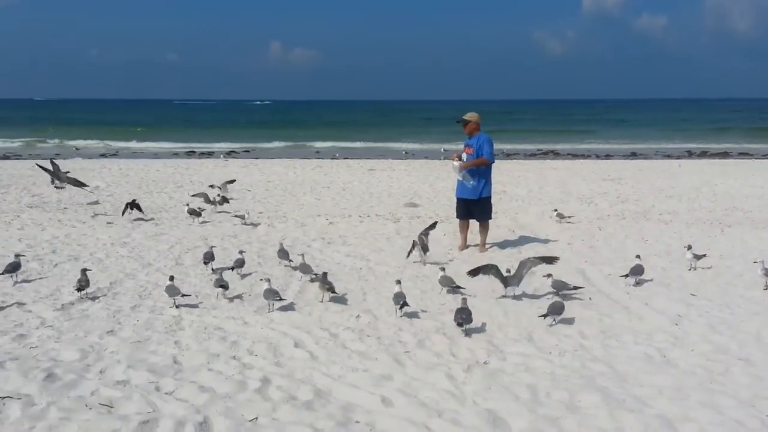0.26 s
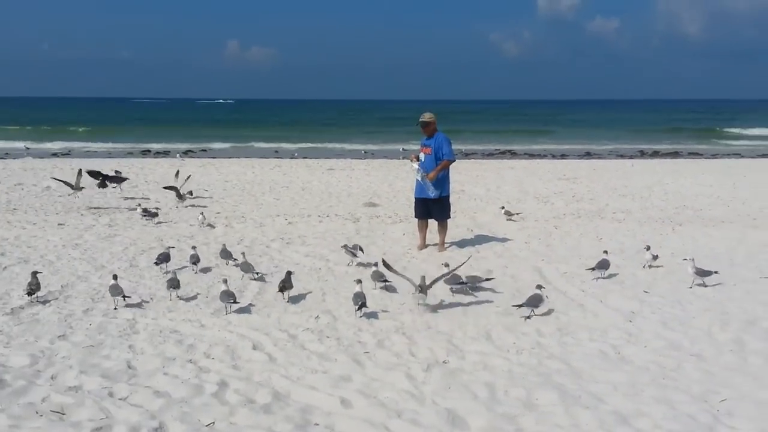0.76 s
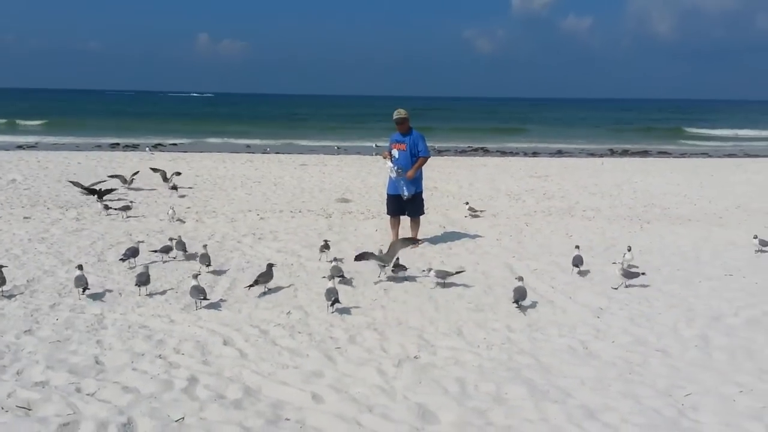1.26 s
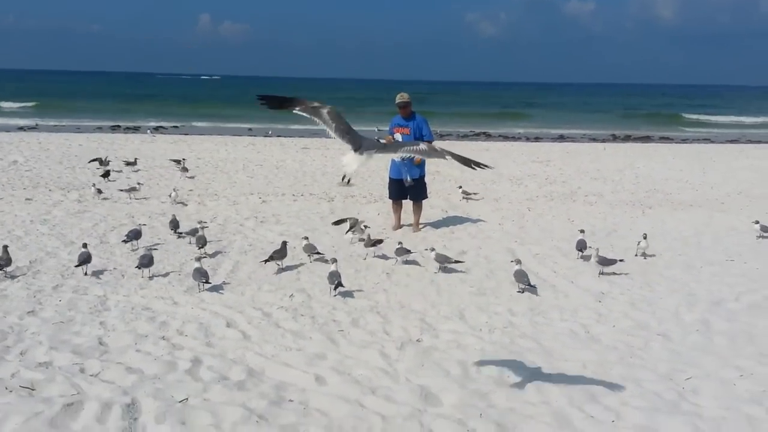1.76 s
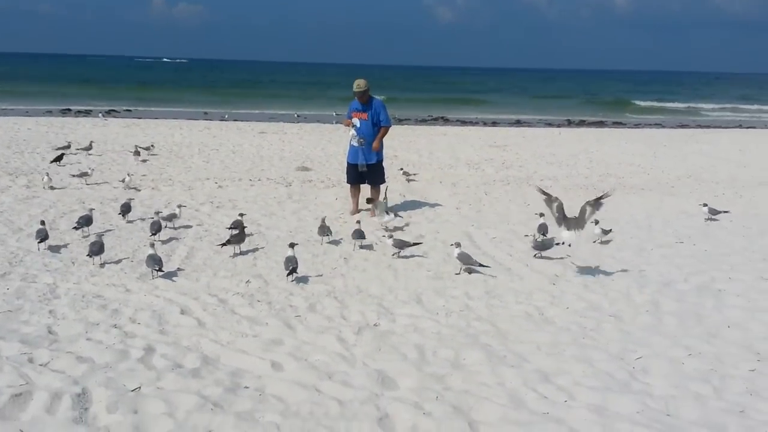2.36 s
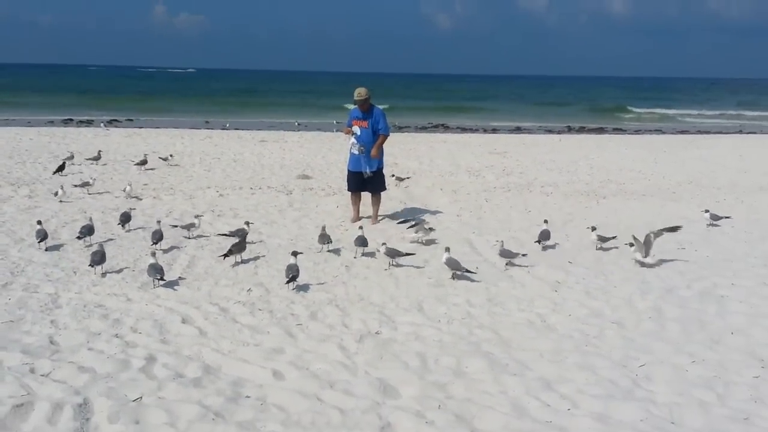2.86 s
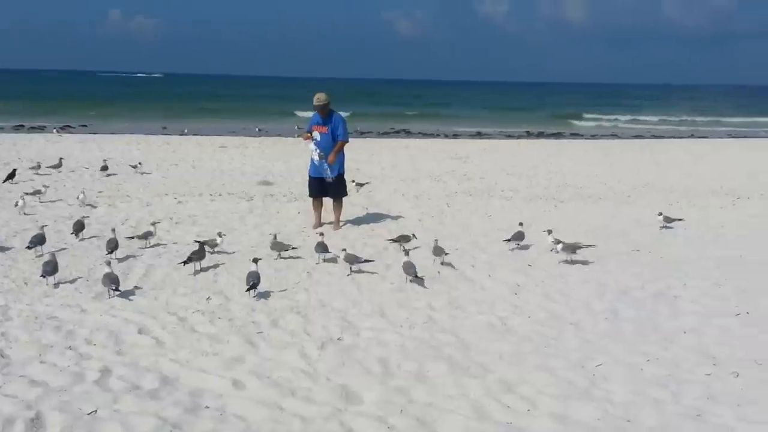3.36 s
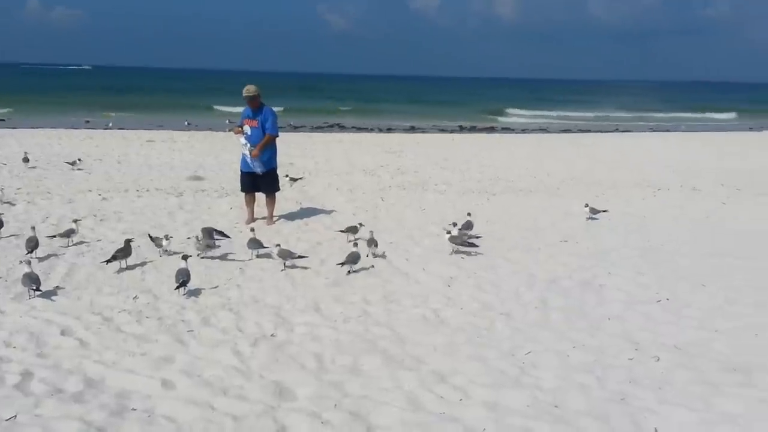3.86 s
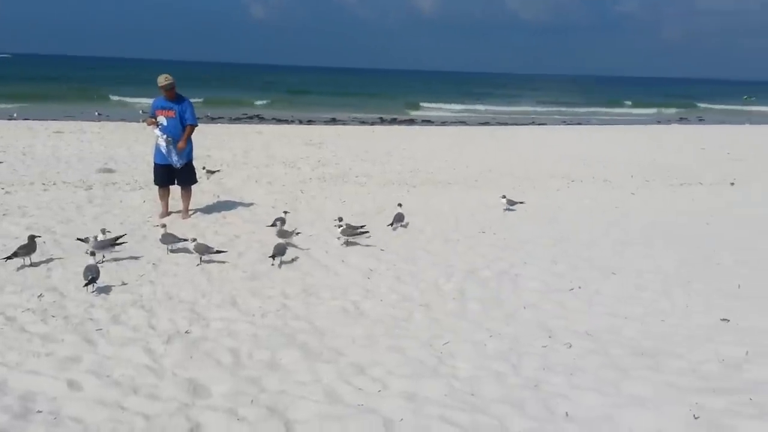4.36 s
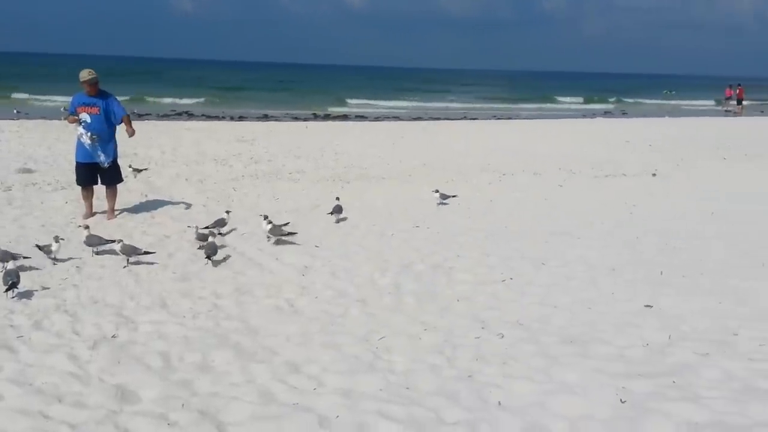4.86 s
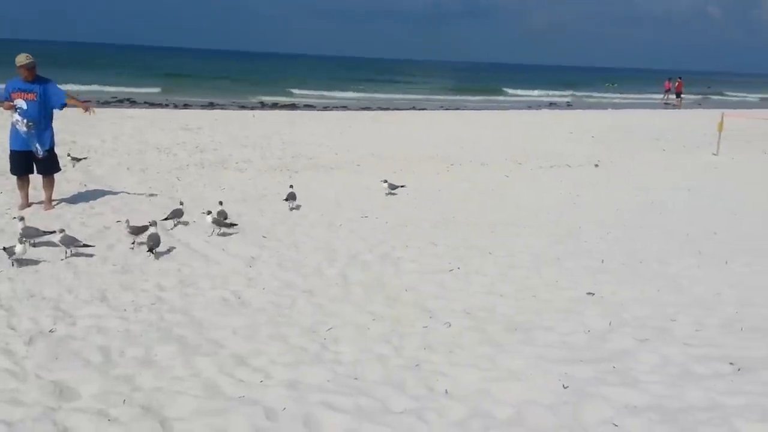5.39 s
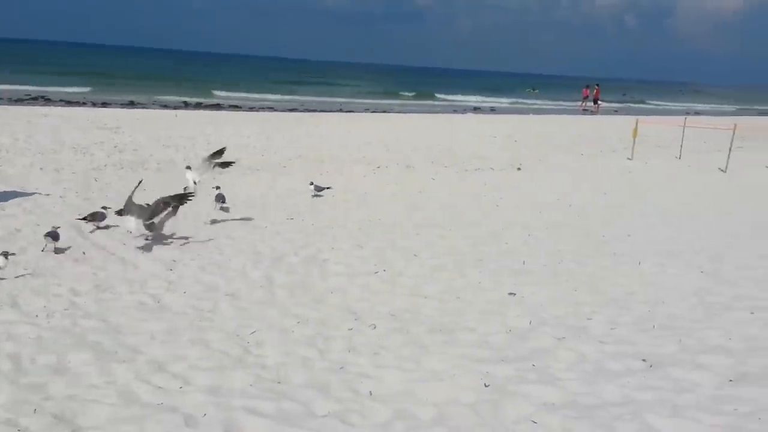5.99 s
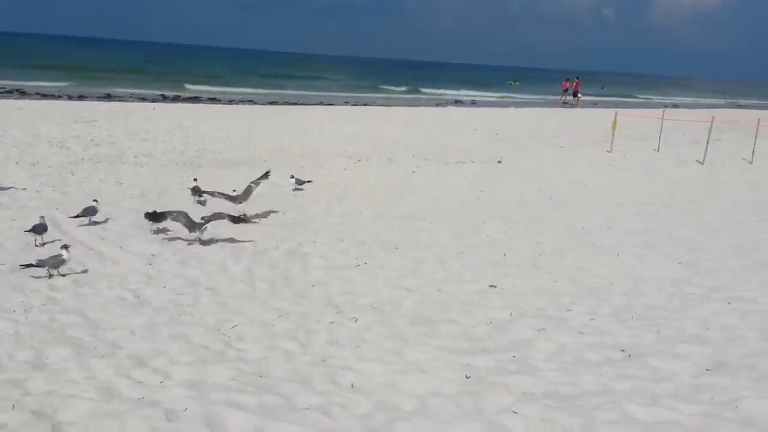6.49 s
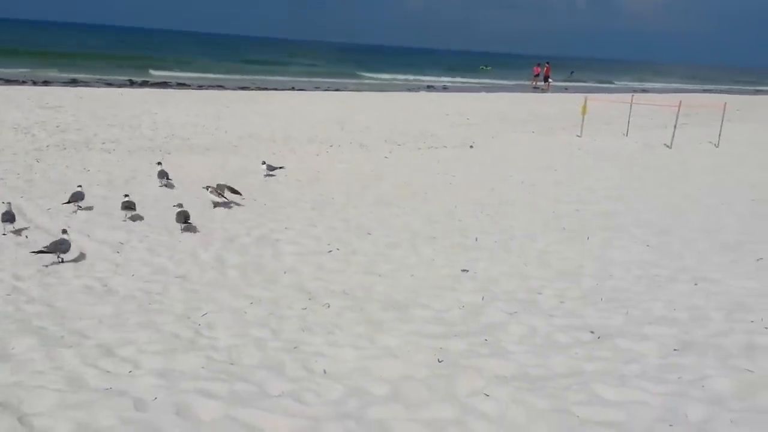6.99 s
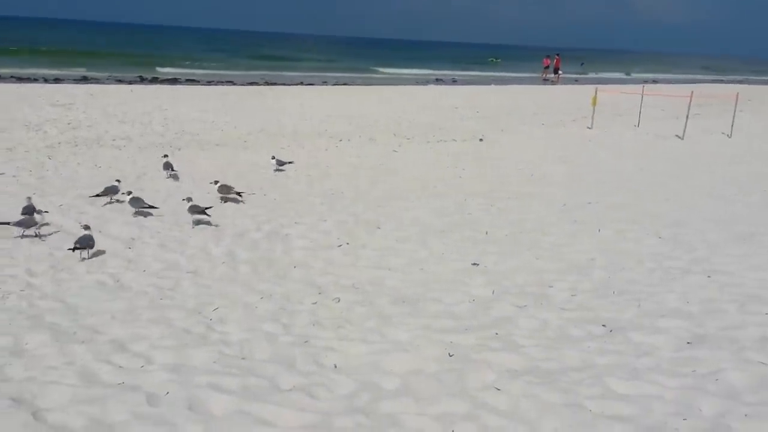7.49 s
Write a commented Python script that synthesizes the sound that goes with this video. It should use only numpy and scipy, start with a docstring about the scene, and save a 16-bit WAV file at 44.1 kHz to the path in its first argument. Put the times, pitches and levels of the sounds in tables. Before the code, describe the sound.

An open beach with gulls begging, low surf behind and a faint far engine hum with an unsteady drone. At 0 s a short raspy squawk leads into a thin warbling whistle around 3 kHz, lasting a third of a second, then a soft cluck. Squawks with clear peeps come at 0.75 and 1.05 s, followed by a bending double whistle at 1.2 s. Another squawk, cluck and short warble run from 1.6 to 1.95 s. Surf mostly fills the gap, with very faint clucks near 2.5 s. A small squawk at 3.45 s, a hoarse fading mew with peeps from 3.75 to 4.05 s, and a short squawk at 4.45 s follow. The loudest burst, harsh squawk and high sobbing whistle, runs 5.0 to 5.5 s as a wave swells. A similar call comes at 5.97 to 6.35 s. The engine eases at 6.5 s; a last squawk and peep sound at 6.85 s, then surf alone.

```python
"""Gulls beg for food on an open beach: thin warbling whistles, peeps, raspy squawks, clucks, one hoarse mew.
Whistles and peeps are nearly pure syrinx tones; the rougher cries are syrinx pulses that ring the throat,
and forcing them makes the cycles uneven and hissy. Sand scatters a brief, weak copy of every call.
Low surf, noise in bands that swell with the breakers, rushes behind them. A far engine hums with its
octave beside an unsteady drone. A stereo recorder listens: its body shades one side and its top is cut."""
import sys
import numpy as np
from scipy import signal
from scipy.fft import rfft, irfft, next_fast_len
from scipy.io import wavfile
from scipy.ndimage import uniform_filter1d

SR = 44100
rng = np.random.default_rng(int(sys.argv[2]) if len(sys.argv) > 2 else 0)


def dump(signal):
    """Clip the signal to [-1, 1] and save it as 16-bit WAV at the path in sys.argv[1]."""
    limited = np.clip(np.atleast_2d(signal).T, -1, 1)
    pcm = np.round(limited * 32767).astype(np.int16)
    wavfile.write(sys.argv[1], SR, pcm)


N = 341334
TIME = np.arange(N) / SR

# Sobs that chain into begging whistles; most lift to a crest and fall into the next:
# start_s, dip_pitch_hz, lift_hz, crest_place (0-1 of the sob), dip_level_db
SOBS = [ (0, 3030, 10, .5, -18), (.04, 3070, 0, .5, -25), (.095, 3330, 30, 0.46, -27.5),
        (.185, 3473, 1100, .5, -26.5), (.202, 3260, -70, .4, -26), (.22, 3270, 330, .55, -25),
        (.26, 3050, 220, 0.54, -22.5), (1.677, 3050, 150, 0.5, -39), (1.745, 3060, 240, .64, -26.5),
        (1.819, 3070, 300, 0.4, -26), (5.055, 2960, 45, .5, -16.5), (5.074, 3100, -10, .5, -15),
        (5.102, 3030, -75, 0.56, -19.5), (5.167, 4347, 0, .5, -23), (5.215, 4270, 168, 0.78, -23),
        (5.263, 3990, 310, 0.45, -19.5), (5.305, 3900, 409, 0.5, -18.5), (5.349, 3830, 490, .65, -16.5),
        (5.396, 3670, 440, 0.6, -19.5), (5.435, 3030, -30, 0.6, -20.5), (5.449, 2915, 10, .5, -15.5),
        (6.003, 3050, 45, .35, -16), (6.04, 3130, 200, 0.83, -25.5), (6.12, 3310, 250, 0.8, -23.5),
        (6.171, 3250, 352, .78, -24.5), (6.217, 3160, 460, 0.75, -21), (6.271, 3085, 0, .5, -21),
        (6.284, 3080, 269, .38, -21.5)]
# Whistles; each takes the waiting sobs up to its end: end_s, last_pitch_hz, last_level_db,
# thinning (dB per Hz of lift), octave_db (before bill and thinning), third_partial_db (re octave),
# half_line_db, left_minus_right_db (where fully shaded), left_lag_ms
WHISTLES = [ (.332, 2860, -38, .012, -10.5, -26, -25, -4.5, -.03),
            (1.886, 2845, -33, .01, -17.5, -8.5, -32, 1, -.039),
            (5.168, 3490, -30, 0.03, 0, -19, -26, -12, .033),
            (5.435, 3860, -22.5, .019, -13, -25, -36, -3, -.035),
            (5.488, 2760, -38, -0.02, -3, -22, -34, -8, .031),
            (6.355, 2790, -32, .022, -11, -24, -29, -10.5, .11)]
# Bill colouring of the whistles' octave: frequency_hz, gain_db
BILL = [(5600, -9), (6150, 0.5), (6500, -5), (6900, -9), (7800, -27), (8500, -9)]
# Two voices of a double whistle: time_s, pitch_hz, level_db, octave_db (re fundamental)
WHISTLE_ARCH = [(1.138, 3000, -39, -9), (1.17, 3220, -32, 1), (1.21, 3450, -37.5, 2.5),
                (1.245, 3580, -40, -2), (1.275, 3490, -39, 2.5), (1.3, 3160, -30, -1),
                (1.318, 2800, -43, -10)]
WHISTLE_FLAT = [(1.176, 3060, -32, -20), (1.186, 2970, -25, -14), (1.205, 2924, -22.5, -16),
                (1.225, 3080, -28.5, -8), (1.25, 3130, -33, -3), (1.275, 3020, -36, -12)]
# Both sides of the syrinx in that one call: curve, third_partial_db (re octave),
# left_minus_right_db (where fully shaded), left_lag_ms
TWO_VOICES = [(WHISTLE_ARCH, -13, -1, .027), (WHISTLE_FLAT, -22, -10, .06)]
# Short near-pure notes: peeps, clear notes within squawks, and the mew's last overtone:
# start_s, end_s, top_pitch_hz, end_sag (share of pitch), glide (share of pitch),
# level_db (at the swell's peak), left_minus_right_db (where fully shaded)
CLEAR_NOTES = [ (.76, 0.784, 2195, 0.0052, 0, -29.5, -16), (0.777, 0.813, 3035, 0.046, 0.0072, -28, -11),
               (1.054, 1.086, 2250, 0.013, .012, -26.5, -14), (1.072, 1.11, 3030, 0.0032, -0.04, -26.5, -9),
               (1.633, 1.65, 2180, 0.019, -.01, -34, -2), (1.639, 1.675, 3080, .025, .012, -27, 1),
               (1.879, 1.9, 2440, 0, -0.256, -33.5, -4), (3.459, 3.517, 3010, 0.079, 0.0014, -33, -16),
               (3.895, 3.947, 3000, 0.032, 0, -31, -22), (3.923, 3.967, 3080, 0.08, 0.022, -25.5, -14),
               (4.02, 4.084, 2300, 0.017, 0, -38.5, 1.5), (4.457, 4.507, 2965, 0.102, -0.093, -32, -12.5),
               (6.85, 6.866, 2170, .01, 0, -34, -4), (6.861, 6.91, 3070, 0.034, -0.025, -34, -15)]
# Squawks: start_s, end_s, top_pitch_hz, end_sag (share of pitch), glide (share of pitch),
# level_db (at the swell's peak), start_roughness (0 clean, about 1 harsh), end_roughness (same scale),
# left_minus_right_db (where fully shaded)
SQUAWKS = [ (0, .022, 736, .02, 0, -31, 0.6, .3, -5), (.35, .42, 865, .14, -0.0068, -34, .18, .18, -2.5),
           (.722, .78, 640, 0.044, .2, -32.5, 0.56, 0.6, -2.5),
           (.758, .795, 726, .02, 0.0071, -26.5, 0.32, 0, -16),
           (1.026, 1.076, 655, .05, 0.21, -32, 0.4, 0.7, -9),
           (1.585, 1.652, 684, 0.043, 0.18, -29.5, .7, 1.22, -2),
           (1.618, 1.657, 750, 0.0082, -0.033, -26.5, 0.7, 0.1, -19),
           (1.895, 1.965, 713, .16, -.02, -37.5, .35, .4, -1),
           (3.44, 3.525, 987, .14, 0.016, -38.5, 0.37, 0.14, -20.5),
           (4.435, 4.51, 977, 0.143, 0.018, -34, .6, 0.42, -10),
           (5.018, 5.06, 700, .03, .05, -28.5, 0.76, 1, -6),
           (5.035, 5.063, 732, 0.033, 0.029, -16, 1.03, 0.64, -7),
           (5.966, 6.015, 732, 0.046, 0.002, -21.5, 0.96, 0.83, -11),
           (6.82, 6.874, 685, 0.039, 0.17, -33, 0.4, 0.3, -13),
           (6.857, 6.905, 1022, 0.024, -0.02, -30.5, 0.19, 0, -17)]
# Low clucks, and the low, darker part under some squawks: start_s, end_s, top_pitch_hz,
# end_sag (share of pitch), glide (share of pitch), level_db (at the swell's peak),
# start_roughness (0 clean, about 1 harsh), end_roughness (same scale),
# left_minus_right_db (where fully shaded)
LOW_CALLS = [ (.345, .425, 860, .2, -0.009, -37.5, 0.22, .2, -1),
             (1.03, 1.07, 600, .03, .2, -41, .4, .5, -3), (1.585, 1.645, 620, .03, .18, -40, .5, .7, -1),
             (1.685, 1.742, 665, 0.27, 0.036, -31, .3, 0.22, 1),
             (1.89, 1.97, 713, .2, -0.0058, -32.5, .4, 0.43, 4),
             (2.4, 2.5, 632, 0.15, -0.0065, -40, 0.26, 0.24, 0),
             (2.46, 2.69, 1015, 0.0092, -0.025, -43, 0.29, 0.28, 0),
             (5.035, 5.075, 736, .03, 0.032, -36.5, 1, .8, -3),
             (6.03, 6.12, 621, 0.018, -0.044, -40.5, 0.18, .2, -2),
             (6.215, 6.28, 774, 0.1, 0.0052, -41.5, .2, .2, -2)]
# The hoarse mew's push of air: time_s, pitch_hz, effort_db (evened and raised in mew())
MEW_CURVE = [(3.758, 1011, -46), (3.782, 1116, -33), (3.802, 1166, -30.5), (3.85, 1219, -26.5),
             (3.934, 1078, -35.5), (3.964, 1049, -45), (4.02, 1068, -45), (4.035, 1162, -41)]
# Throat resonances: centre_hz, width_hz, gain_db
SQUAWK_THROAT = [(2176, 125, 9), (2950, 440, 8), (4120, 420, -5), (4860, 190, -29), (5960, 2400, -7.5)]
LOW_CALL_THROAT = [(1150, 400, 23), (2200, 250, -21), (2800, 450, -14), (4240, 1200, -3)]
MEW_THROAT = [(1050, 160, -13.5), (2345, 220, 4.5), (3720, 1040, -4.5), (4480, 430, -0.5), (5560, 470, -11),
              (7300, 870, -13), (9500, 800, -20.5), (11100, 700, -25)]
# Share of a call's left-right difference round the recorder's body: frequency_hz, share (0-1)
SHADOW = [(1200, 0.17), (2200, 0.29), (3000, 1), (3450, 0.37), (4000, 0.12), (5000, 0.41), (6200, 0.44)]
# Surf spectrum: frequency_hz, density_db (per Hz, relative)
SURF_SPECTRUM = [(25, -40), (62, -12), (100, -8.5), (150, -6), (230, 0), (350, -0.5), (480, -6),
                 (650, -10.5), (1050, -7), (1600, -14.5), (2250, -11), (2800, -16), (3800, -12),
                 (6000, -22), (9000, -26.5), (14500, -35.5)]
# Surf likeness of the two ports: frequency_hz, likeness (-1 to 1)
SURF_LIKENESS = [(40, 0.35), (80, 0.45), (160, 0.82), (330, 0.96), (600, 0.44), (900, 0.47), (1400, -0.47),
                 (2300, 0.083), (3500, 0.017), (6000, -0.023), (14000, 0.068)]
# Surf balance: frequency_hz, left_minus_right_db
SURF_BALANCE = [(40, 9), (80, 13.5), (130, 0), (800, 0.5), (1400, 1.5), (2000, 1.5), (2550, -4),
                (3150, -0.5), (3800, 0.5), (5000, -6), (6000, -0.5), (8000, -1.5), (9500, 3.5), (11500, 22)]
# Waves that break: time_s, strength (relative)
BREAKERS = [(0, .9), (1.15, .45), (5.1, 0.97), (5.75, 0.53), (7.3, 0.28)]

SYRINX_START_S, SHORTEST_SOB_S = .003, .01
SOB_SHAPE = 1.35  # above 1, the pitch lingers in the dips
SQUAWK_LAG_MS = -.03  # negative: the left port hears squawks and low calls first
BREAK_RISE_S, BREAK_FALL_S, WASH_LAG_S = 0.31, .9, 0.26
RUMBLE_SWELL_DB, WASH_SWELL_DB, FOAM_SWELL_DB = 3, 2.5, 5.5  # per unit of breaking strength
SURF_DB = -35.5
ENGINE_DB, ENGINE_EASES_S, ENGINE_EASE_S, ENGINE_DROP_DB = -49.5, 6.5, .1, 8
TOP_HZ = 14650


def undb(db):
    """Decibels to gain."""
    return 10 ** (np.asarray(db) / 20)


def on_log_axis(hz, points):
    """Read (Hz, value) points on a log-frequency axis."""
    f, value = np.transpose(points)
    return np.interp(np.log(np.maximum(hz, 1)), np.log(f), value)


def follow(curve):
    """The sample times that a curve spans, and its columns at those times."""
    s, *columns = np.transpose(curve)
    t = np.arange(int(max(s[0], 0) * SR), int(s[-1] * SR)) / SR
    return [t] + [np.interp(t, s, c) for c in columns]


def wander(t, rate):
    """Random drift of spread 1 that takes a new course `rate` times a second."""
    steps = rng.standard_normal(8192)
    return np.sqrt(3 / 2) * np.interp((t - t[0]) * rate, np.arange(len(steps)), steps)


def fade(t, length):
    """Soft start and stop."""
    edge = np.minimum(t - t[0], t[-1] - t)
    return np.sin(np.pi / 2 * np.clip(edge / length, 0, 1)) ** 2


def add(out, t, sound, pan_db, lag_ms=0):
    """Set a call on the beach: the recorder's body shades one port, and the left port lags."""
    size = next_fast_len(len(sound) + 512)
    hz = np.fft.rfftfreq(size, 1 / SR)
    tilt = undb(pan_db * on_log_axis(hz, SHADOW))
    left = tilt * np.exp(-2j * np.pi * hz * lag_ms / 1000)
    # keep the mean power of the two ports
    ports = np.array([left, np.ones(len(hz))]) / np.sqrt((1 + tilt ** 2) / 2)
    start = int(t[0] * SR)
    out[:, start:start + size] += irfft(rfft(sound, size) * ports, size)[:, :N - start]


def sobbing(sobs, end, last_hz, last_db, thinning):
    """Join sobs into one whistle; level and octave follow the lift. Gives times, pitch, level, octave."""
    start, dip_hz, lift_hz, crest, dip_db = sobs.T
    t, hz, db = follow([*zip(start, dip_hz, dip_db), (end, last_hz, last_db)])
    which = np.searchsorted(start[1:], t)
    u = np.clip((t - start[which]) / np.diff([*start, end])[which], 0, 1)
    crest = np.clip(crest, .05, .95)[which]
    ramp = np.minimum(u / crest, (1 - u) / (1 - crest))
    lift = lift_hz[which] * np.sin(np.pi / 2 * ramp) ** SOB_SHAPE
    octave_db = on_log_axis(2 * (hz + lift), BILL) + thinning * lift
    return t, hz + lift, db - thinning * lift, octave_db


def whistle(t, hz, db, octave_db, third_db, half_db=-32, jitter=0.005, shimmer_db=0.4, rasp_db=-27):
    """A nearly pure syrinx tone with two overtones and a trace of rasp around it."""
    hz = uniform_filter1d(hz, size=130) * (1 + jitter * wander(t, 700))
    phase = 2 * np.pi * np.cumsum(hz) / SR
    overtones = np.sin(2 * phase) + undb(third_db) * np.sin(3 * phase)
    overtones *= undb(octave_db + 2 * wander(t, 117.9))
    rasp = undb(rasp_db) * wander(t, 2600) * np.cos(phase)
    # a weak line midway between tone and octave sets every other cycle apart
    half_line = undb(half_db) * np.sin(3 * phase / 2)
    tone = np.sin(phase) + overtones + rasp + half_line
    level = undb(db + shimmer_db * wander(t, 228))
    return np.sqrt(2) * tone * level * fade(t, SYRINX_START_S)


def begging_whistles(out):
    """Each warbling whistle is a chain of sobs sung on one syrinx tone."""
    waiting = np.array(SOBS)
    for end, last_hz, last_db, thinning, bright_db, third_db, half_db, pan_db, lag_ms in WHISTLES:
        own = waiting[:, 0] < end - SHORTEST_SOB_S
        t, hz, db, octave_db = sobbing(waiting[own], end, last_hz, last_db, thinning)
        add(out, t, whistle(t, hz, db, bright_db + octave_db, third_db, half_db), pan_db, lag_ms)
        waiting = waiting[~own]


def arch(start, end, top_hz, sag, glide):
    """One push of air: loudness arches while pitch sags at the ends and glides. Gives times, pitch, swell."""
    t = np.arange(int(start * SR), int(end * SR)) / SR
    u = np.linspace(-1, 1, len(t))
    return t, top_hz * (1 - sag * u ** 2 + glide * u), 1 - u ** 2


def throat_response(f, throat):
    """Throat resonances of alternating sign, with skirts that fall steeply below the lowest."""
    modes = [undb(db) / (1 + 1j * (f / centre - centre / f) * centre / width)
             for centre, width, db in throat]
    resonances = sum((-1) ** k * mode for k, mode in enumerate(modes))
    return resonances / (1 + (0.57 * throat[0][0] / f) ** 6)


def cry(t, hz, rough, throat, dull=0, jitter=0.0864, flutter_db=3, half=0.22, air_db=5, air_hz=2800):
    """Syrinx pulses ring the throat; when forced, cycles turn uneven, alternate strong and weak, and hiss."""
    phase = 2 * np.pi * np.cumsum(hz * (1 + jitter * rough * wander(t, 917))) / SR
    strength = undb(flutter_db * rough * wander(t, 579)) * (1 + half * rough * np.cos(phase / 2))
    pulses = sum(np.cos(k * phase) / k ** dull for k in range(1, 11)) * strength
    air_band = signal.butter(2, [air_hz, TOP_HZ], "band", fs=SR, output="sos")
    air = signal.sosfilt(air_band, rng.standard_normal(len(t)))
    source = pulses + undb(air_db) * rough * air * (1 + np.cos(phase))
    size = next_fast_len(len(t) + 512)
    f = np.fft.rfftfreq(size, 1 / SR) + 1
    voice = irfft(rfft(source, size) * throat_response(f, throat), size)[:len(t)]
    # steady air pressure evens out the power over a few cycles
    return voice / np.sqrt(uniform_filter1d(voice ** 2, size=200) + 1e-12)


def rough_calls(out, calls, throat):
    """Short pushes of air through one throat, with roughness that slides from start to end."""
    for start, end, top_hz, sag, glide, db, rough_start, rough_end, pan_db in calls:
        t, hz, swell = arch(start, end, top_hz, sag, glide)
        rough = np.linspace(rough_start, rough_end, len(t))
        add(out, t, undb(db) * swell * cry(t, hz, rough, throat), pan_db, SQUAWK_LAG_MS)


def squawks(out):
    """Squawks ring a bright throat, strongest between 2 and 3 kHz."""
    rough_calls(out, SQUAWKS, SQUAWK_THROAT)


def sand(calls, scatter_db=-13, t60=0.034):
    """Rippled sand scatters a brief, weak copy of each call, unlike at the two ports."""
    t = np.arange(8192) / SR
    bounce = rng.standard_normal((2, len(t))) * undb(-60 * t / t60) * (t > .001)
    bounce /= np.sqrt(np.sum(bounce ** 2, axis=1, keepdims=True))
    return undb(scatter_db) * signal.fftconvolve(calls, bounce, axes=1)[:, :N]


def breaking(t):
    """How hard the sea breaks about its usual state: each wave builds quickly and drains slowly."""
    surge = sum(strength * np.exp(np.minimum((t - s) / BREAK_RISE_S, (s - t) / BREAK_FALL_S))
                for s, strength in BREAKERS)
    return surge - np.median(surge)


def surf(flicker_db=1, surge_db=0.2):
    """Breakers rumble, water washes and foam hisses; each band churns a little on its own."""
    f = np.fft.rfftfreq(N, 1 / SR)
    likeness = np.clip(on_log_axis(f, SURF_LIKENESS), -.98, .98)
    mid, side = rfft(rng.standard_normal((2, N)))
    ears = np.array([[1], [-1]])
    tilt = undb(ears * on_log_axis(f, SURF_BALANCE) / 2)
    water = mid + ears * side * np.sqrt((1 - likeness) / (1 + likeness))
    water = water * tilt / np.sqrt(np.mean(tilt ** 2, axis=0))
    water *= undb(on_log_axis(f, SURF_SPECTRUM))
    water /= np.std(irfft(water, N).mean(axis=0))
    sea = breaking(TIME)
    rumble, foam = RUMBLE_SWELL_DB * sea, FOAM_SWELL_DB * sea
    wash = WASH_SWELL_DB * breaking(TIME - WASH_LAG_S)
    octave = np.log2(np.clip(f, 2 ** 6, 2 ** 14))
    out = 0
    # half-octave bands that overlap and sum to the whole
    for centre in np.arange(12, 29) / 2:
        band = irfft(water * np.maximum(1 - 2 * abs(octave - centre), 0), N)
        low = np.clip((700 - 2 ** centre) / 300, 0, 1)
        high = np.clip((2 ** centre - 1500) / 6000, 0, 1)
        swell_db = low * rumble + (1 - low - high) * wash + high * foam
        churn_db = flicker_db * wander(TIME, 22) + surge_db * wander(TIME, 3.0)
        out = out + band * undb(swell_db + churn_db)
    return undb(SURF_DB) * out


def engine(hz=121.5, octave_db=-6, drone_hz=170, drone_db=-53):
    """A far engine hums with its octave, then eases off, beside a second, less steady drone that stays."""
    phase = 2 * np.pi * np.cumsum(hz * (1 + 0.00381 * wander(TIME, 5))) / SR
    db = ENGINE_DB - ENGINE_DROP_DB * np.clip((TIME - ENGINE_EASES_S) / ENGINE_EASE_S, 0, 1)
    hum = np.sin(phase) + undb(octave_db) * np.sin(2 * phase)
    hum *= undb(db + 2.25 * wander(TIME, 6))
    drone_phase = 2 * np.pi * np.cumsum(drone_hz * (1 + 0.02002 * wander(TIME, 6))) / SR
    drone = np.sin(drone_phase) * undb(drone_db + 2.5 * wander(TIME, 4.28))
    return np.sqrt(2) * (hum + drone)


def low_calls(out):
    """Low clucks, and the low part under some squawks, ring a darker throat, strongest near 1150 Hz."""
    rough_calls(out, LOW_CALLS, LOW_CALL_THROAT)


def clear_notes(out):
    """Short near-pure syrinx notes: peeps, clear notes within squawks, and the mew's last overtone."""
    for start, end, top_hz, sag, glide, db, pan_db in CLEAR_NOTES:
        t, hz, swell = arch(start, end, top_hz, sag, glide)
        add(out, t, swell * whistle(t, hz, db, octave_db=-20, third_db=-18), pan_db, lag_ms=-.02)


def double_whistle(out):
    """One call sounds both sides of the syrinx at once, each on its own pitch curve."""
    for curve, third_db, pan_db, lag_ms in TWO_VOICES:
        t, hz, db, octave_db = follow(curve)
        add(out, t, whistle(t, hz, db, octave_db, third_db), pan_db, lag_ms)


def mew(out, dulling_per_db=0.1, gain_db=2.3, rough_peak=.47, clearing_db=14, evening=0.83):
    """A long call, hoarsest where it is loudest, that loses its overtones as the push of air dies away."""
    t, hz, db = follow(MEW_CURVE)
    slack_db = db.max() - db
    rough = rough_peak * np.exp(-slack_db / clearing_db)
    dull = dulling_per_db * slack_db * np.linspace(0, 1.3, len(t))
    level = undb(db.max() + gain_db - evening * slack_db) * fade(t, 0.01)
    voice = cry(t, hz, rough, MEW_THROAT, dull, jitter=0.055, half=0.64, air_db=11)
    add(out, t, level * voice, pan_db=1, lag_ms=-.01)


def gulls():
    """All the calls of the flock at the two ports."""
    out = np.zeros((2, N))
    for voice in (begging_whistles, squawks, low_calls, clear_notes, double_whistle, mew):
        voice(out)
    return out


def scene():
    """Gulls in front, surf and engine behind."""
    calls = gulls()
    return calls + sand(calls) + surf() + engine()


def record(dry):
    """The recorder cuts the top with a steep low-pass."""
    return signal.sosfilt(signal.ellip(10, .2, 80, TOP_HZ, fs=SR, output="sos"), dry)


dry = scene()
out = record(dry)
dump(out)
```